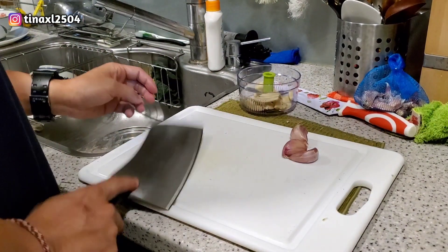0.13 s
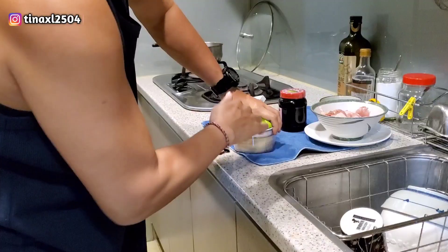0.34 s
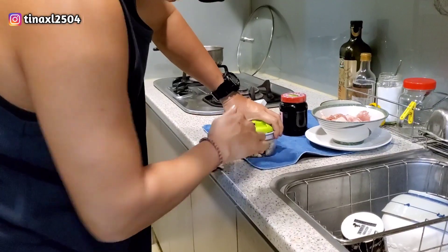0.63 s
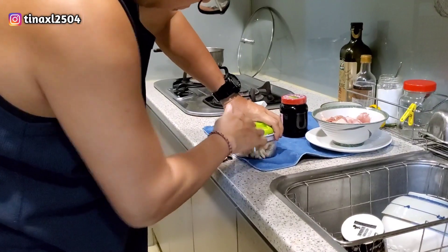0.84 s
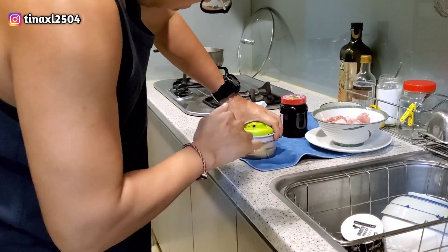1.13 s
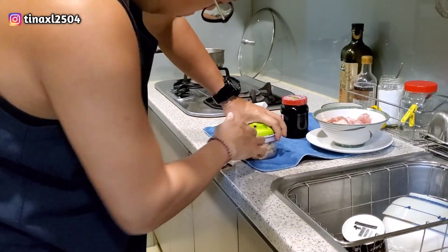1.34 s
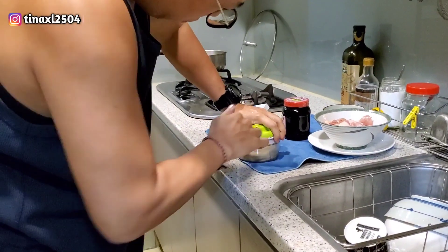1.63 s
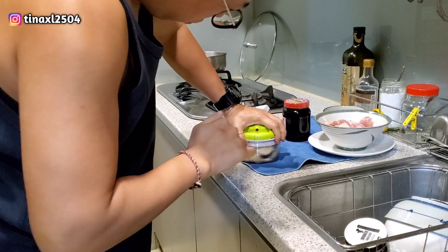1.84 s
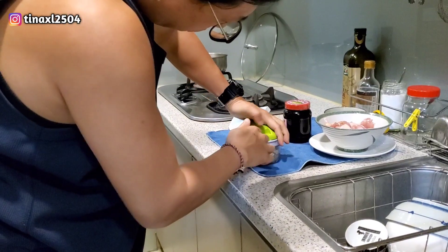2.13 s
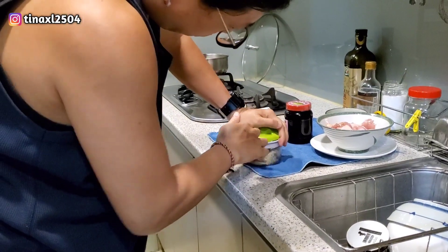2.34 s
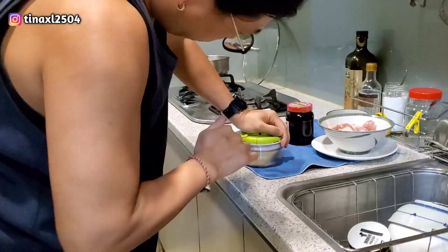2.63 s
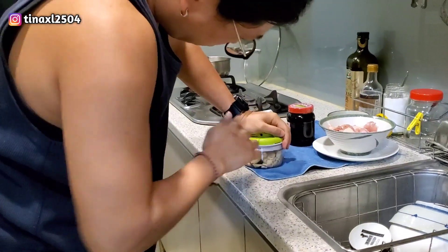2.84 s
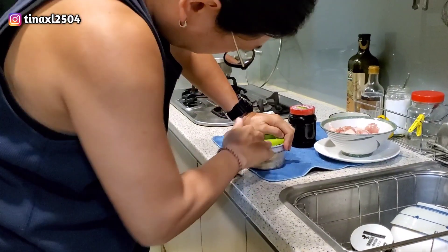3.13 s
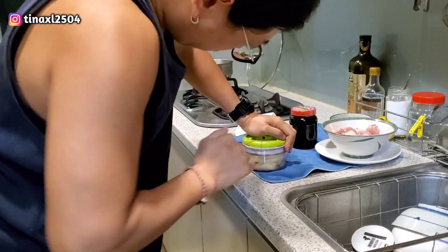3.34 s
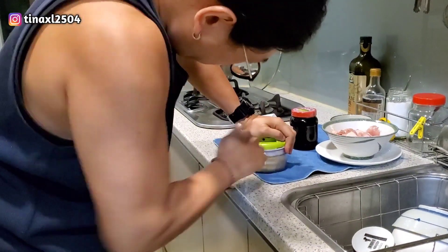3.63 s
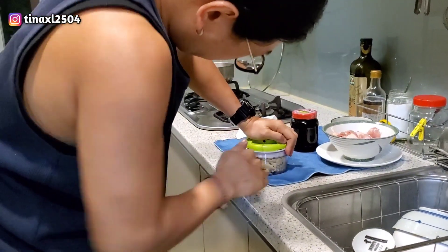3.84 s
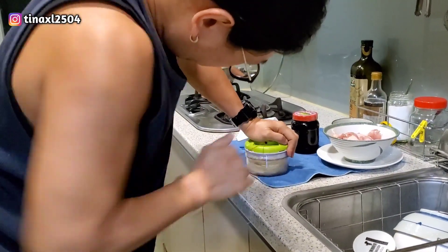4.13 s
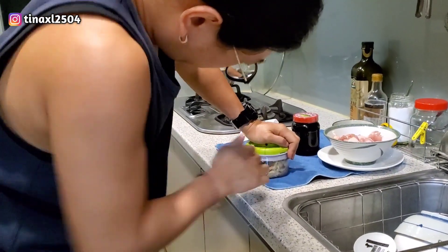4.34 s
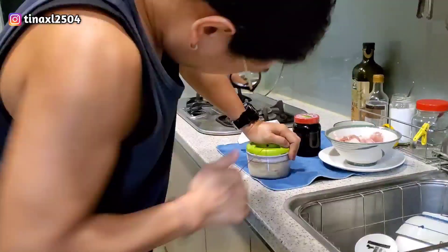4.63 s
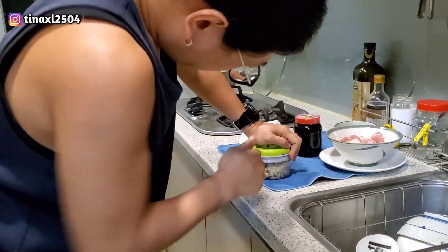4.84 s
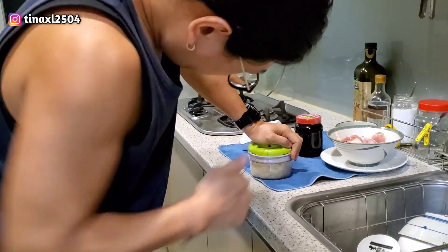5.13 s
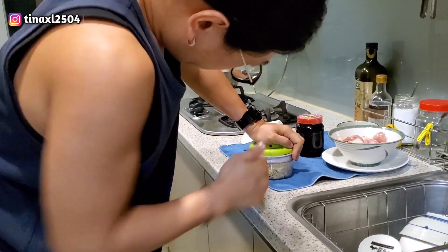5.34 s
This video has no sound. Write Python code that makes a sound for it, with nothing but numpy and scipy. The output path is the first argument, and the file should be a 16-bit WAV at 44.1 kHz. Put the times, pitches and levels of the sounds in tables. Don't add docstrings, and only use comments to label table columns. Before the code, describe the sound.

First a dying blade-and-board ring over faint hum, then close, gritty churning from a hand-pulled chopper. Hollow plastic bowl rattle surges with every pull, sags, and returns as the spring winds back with a ratchety zip. Clutch clacks mark the turns, one very hard near the middle. Low counter rumble beneath, brief squeaky plastic tones above, short tiled-room reflections, two spaced microphones.

```python
import sys
import numpy as np
from scipy import signal
from scipy.fft import rfft, irfft, next_fast_len
from scipy.io import wavfile
from scipy.ndimage import uniform_filter1d, map_coordinates

SR = 44100
rng = np.random.default_rng(int(sys.argv[2]) if len(sys.argv) > 2 else 0)


def to_linear_factor(level_db):
    exponent = np.asarray(level_db, float) / 20
    return 10 ** exponent


def generate_wav(signal):
    frames = np.transpose(np.atleast_2d(signal))
    scaled = np.clip(frames, -1, 1) * 32767
    pcm = np.round(scaled).astype(np.int16)
    wavfile.write(sys.argv[1], SR, pcm)


N = 242550

# frequency in Hz, level in dB, time to fade by 60 dB in seconds.
BLADE_RING = [(50, -3, 1.2), (199, -17, .9), (348, -7, .33), (513, -9, 1.2), (606, -17, .6),
              (1319, -21, .3), (2326, -25, .5), (2729, -3, .5), (2752, -9, .2), (3560, -19, .55),
              (3854, -16, .25), (4440, -14, .45), (6525, -26, .4)]
# frequency in Hz, level in dB, time to fade by 60 dB in seconds.
BOARD_THUD = [(206, 7, 0.2), (377, 0, 0.27), (109, -11, .2)]
# frequency in Hz, level in dB per Hz.
ECHO_COLOUR = [(35, -35), (60, -10), (600, -11), (720, -24), (1600, -23.5), (2780, -19), (4510, -27),
               (15000, -33.5)]
# frequency in Hz, level in dB per Hz.
ROOM_AIR = [(35, -29), (60, -7), (85, -37), (150, -25), (355, -29), (514, -33), (700, -39.5), (15000, -67)]
# frequency in Hz, time to fade by 60 dB in seconds.
TILE_ECHO = [(100, 0.36), (500, 0.41), (3000, 0.42), (12000, 0.27)]

# time in seconds, level in dB.
LONE_KNOCKS = [
    (0.289, -14),
    (3.6204, 29.5),
]
# time in seconds, peak in dB,
# then lid chatter, bright pawl chatter and rap, all in dB over that peak.
CATCHES = [(0.4085, -11.5, -1, -25, -6), (0.6474, -7, -8, -7.5, -8), (0.7, 1.5, -16, -12.5, -8),
           (0.884, -4, 0, -8.5, -16), (0.9527, -4, -1, -28, -6), (1.236, -16, 3, -4, -6),
           (1.272, -3, -4, -30, 2), (1.547, -2, -1.5, -14.5, -13), (1.938, -11, -21, -8, -8),
           (2.34, -9, -6, -13.5, -12), (2.818, -22.5, -2, -3, -12), (2.8524, -4.5, 3.5, -20, -11),
           (3.1365, -2.5, 0.5, -9.5, -16), (3.4255, -10, -9, -10, -6), (3.618, 5, -9, -17.5, -4),
           (3.854, -18, -16, -5, 8), (4.055, -1, -1, -12, -6), (4.31, -25, -18, -14, -6),
           (4.549, 0, -6.5, -9, -19), (4.797, -11, -19, -10, -8), (5.051, -1, -5, -12.5, -14),
           (5.324, -22, -10, -7, -12), (5.341, -5, 1.5, -16, -15)]
# frequency in Hz, width in Hz, level in dB.
LID_KNOCK = [(900, 500, -9), (1600, 450, 0), (2200, 350, -3), (4500, 3000, -18)]

# start in seconds, time to full speed in seconds,
# run-down in seconds, bowl level in dB, lid level in dB.
PULLS = [(0.301, 0.23, 0.13, -21, -23.5), (0.888, 0.14, 0.22, -17, -20), (1.549, 0.16, 0.2, -20, -24),
         (2.342, 0.23, 0.27, -22.5, -24), (3.139, 0.16, 0.1, -13.5, -18),
         (3.621, 0.085, 0.15, -20.5, -23.5), (4.059, .12, 0.11, -15.5, -20.5),
         (4.552, 0.099, 0.14, -14.5, -19), (5.055, 0.15, 0.095, -16.5, -23)]
# start in seconds, run-down in seconds,
# then bowl, ratchet and spring levels in dB.
RETURNS = [(0.647, 0.13, -18, -27, -15.5), (1.235, 0.17, -25, -28, -21.5), (1.932, 0.21, -22, -24.5, -18),
           (2.844, 0.16, -19.5, -25.5, -15.5), (3.426, 0.093, -19, -24, -27),
           (3.858, 0.088, -18.5, -26, -25), (4.311, 0.14, -19.5, -22.5, -35),
           (4.794, 0.14, -18, -23.5, -28), (5.336, 0.079, -16.5, -20, -28)]
LOSS_PER_SLOWING = [.9, 1.1, 1.4, 1.7]
REST_DB = [-46, -50, -66, -80]

# frequency in Hz, width in Hz, level in dB.
BOWL = [(373, 72, -5), (504, 61, -0.5), (638, 82, -3.5), (759, 45, 0.5), (970, 296, -4), (1180, 248, 1.5),
        (1432, 510, -5.5)]
# frequency in Hz, width in Hz, level in dB.
LID = [(1710, 254, -9), (1888, 99, 1.5), (2180, 310, -1)]
# frequency in Hz, width in Hz, level in dB.
RIM = [(2600, 380, 0), (3000, 520, -2)]
# time in seconds, rim level in dB over the lid.
GRIP = [(0, -41), (1.2, -46), (2.8, -35), (3.2, -8.5), (3.9, -8.5), (4.4, -6.5), (5.5, -1.5)]
# frequency in Hz, width in Hz, level in dB.
PAWL = [(3130, 3400, 3), (5040, 5250, 4.5), (6740, 1060, 4.5), (9930, 1730, -6), (11900, 2000, 1),
        (13720, 3400, -6)]
# frequency in Hz, width in Hz, level in dB.
SPRING = [(3850, 200, -6), (4400, 200, -8), (6480, 250, -5), (9050, 300, -6), (9680, 300, -4),
          (10620, 450, 0), (11250, 350, -3)]

# time in seconds,
# drumming in dB over the bowl, rumble in dB.
HAND_PRESS = [(0.3, 6, -74), (0.46, -14, -33), (1.15, -8, -36.5), (1.55, -9, -42), (1.95, -10.5, -36.5),
              (2.7, -8, -40.5), (3.3, -10.5, -35), (3.62, -10, -49), (3.82, -8.5, -36), (4.1, -10, -50),
              (4.45, -5.5, -43), (4.9, -9, -46), (5.5, -9, -45)]
# frequency in Hz, width in Hz, level in dB.
SLAB = [(145.8, 9.6, -4.5), (212.6, 21.5, 2.5), (223.4, 81, -7)]
# frequency in Hz, level in dB per Hz.
RUMBLE = [(12, -35), (20, 0), (38, -6.5), (107, -3.5), (120, -3.5), (160, -48), (260, -120)]

# time in seconds, frequency in Hz, level in dB.
WALL_SONGS = [(0.42, 2210, -18.5), (0.43, 1515, -17.5), (0.45, 786, -19), (0.68, 2240, -28),
              (0.93, 1470, -20), (1.02, 970, -20), (1.03, 1963, -19.5), (1.3, 2260, -26), (1.62, 2293, -26),
              (1.97, 2340, -19.5), (2.52, 1450, -23.5), (2.9, 617.5, -23.5), (3.43, 2730, -21),
              (3.43, 649, -25), (3.46, 1247, -23.5), (3.6, 2114, -19.5), (3.66, 1180, -25),
              (3.89, 2820, -22.5), (4.11, 624, -24), (4.12, 1337, -21.5), (4.32, 640, -25),
              (4.37, 2683, -18.5), (4.55, 756.5, -20), (4.65, 731, -30), (4.83, 2085, -35),
              (5.13, 386, -25.5), (5.36, 1350, -30), (5.37, 2183, -30)]
# time in seconds, frequency in Hz, level in dB.
WALL_SNAPS = [(0.697, 2200, -17), (0.883, 2233, -14), (1.269, 2210, -12), (4.55, 2596, -15),
              (5.053, 2504, -18)]

# frequency in Hz, likeness from 0 to 1.
LIKENESS = [(60, 1), (120, 0.92), (240, 0.97), (480, 0.69), (950, 0.054), (1890, 0.065), (5000, 0.013),
            (15000, 0.17)]
# frequency in Hz, left minus right in dB.
LEFT_LEAN = [(60, -2), (180, 0), (550, -0.5), (1650, -1.5), (4970, -3), (15000, -6)]


def unit(x):
    return x / np.sqrt(np.mean(x ** 2) + 1e-20)


def along(points, hz):
    f, v = np.transpose(points)
    return np.interp(np.log(hz + 1), np.log(f + 1), v)


def curves(rows):
    s, *cols = np.transpose(rows)
    return [np.interp(np.arange(N) / SR, s, c, left=-120) for c in cols]


def wobble(rate):
    knots = rng.standard_normal(int(N * rate / SR) + 4)
    return map_coordinates(knots, [np.arange(N) * rate / SR])


def filtered(x, response):
    m = next_fast_len(x.shape[-1] + SR // 4)
    return irfft(rfft(x, m) * response(np.fft.rfftfreq(m, 1 / SR)), m)[..., :x.shape[-1]]


def resonant(x, modes):
    def response(f):
        total = 0
        for k, (centre, width, db) in enumerate(modes):
            peak = 1j * f * width / (centre * centre - f * f + 1j * f * width)
            total = total + (-1) ** k * to_linear_factor(db) * peak
        return total
    return filtered(x, response)


def hiss(spectrum):
    return unit(filtered(rng.standard_normal((2, N)), lambda hz: to_linear_factor(along(spectrum, hz))))


def chatter(per_s, spread_db, life_s, rub):
    taps = (rng.random(N) < per_s / SR) * to_linear_factor(spread_db * rng.standard_normal(N))
    fall = np.exp(-1 / (life_s * SR))
    scratch = (unit(signal.lfilter([1], [1, -fall], taps)) + rub) * rng.standard_normal((2, N))
    ticks = unit(taps) * np.sign(rng.standard_normal((2, N)))
    return unit(unit(scratch) + 0.32 * ticks)


def patchy(x, depth_db):
    z = signal.stft(x, nperseg=1024)[2]
    field = uniform_filter1d(rng.standard_normal(z.shape[1:]), size=3, axis=0)
    field = uniform_filter1d(field, size=5, axis=1)
    return unit(signal.istft(z * to_linear_factor(depth_db * unit(field)), nperseg=1024)[1][:, :N])


def cleaver():
    t = np.arange(SR // 2) / SR
    ring = np.zeros((2, len(t)))
    for hz, db, t60 in BLADE_RING + BOARD_THUD:
        phase = 2 * np.pi * rng.random((2, 1))
        ring += to_linear_factor(db - 60 * t / t60) * np.sin(2 * np.pi * hz * t + phase)
    hz, when, z = signal.stft(hiss(ECHO_COLOUR)[:, :len(t)], SR, nperseg=256)
    fade = to_linear_factor(-60 * when / along(TILE_ECHO, hz)[:, None])
    echo = signal.istft(z * fade, SR, nperseg=256)[1][:, :len(t)]
    air = hiss(ROOM_AIR)[:, :len(t)]
    cut = np.clip((.385 - t) / .07, 0, 1)
    tail = cut * (to_linear_factor(-27.5) * ring + to_linear_factor(-23.5) * echo + to_linear_factor(-46.0) * air)
    return np.pad(tail, [(0, 0), (0, N - len(t))])


def settle(shakes, t60):
    t = np.arange(SR // 8) / SR
    return signal.fftconvolve(shakes, to_linear_factor(-60 * t / t60) * (1 - np.exp(-t / 0.0024)))[:N]


def catches():
    raps, lid_shake, pawl_shake = np.zeros((3, N))
    for s, db, lid_db, bright_db, rap_db in CATCHES:
        raps[round((s + .0015) * SR)] = to_linear_factor(db + rap_db + 18.5)
        lid_shake[round(s * SR)] = to_linear_factor(db + lid_db - 10.5)
        pawl_shake[round(s * SR)] = to_linear_factor(db + bright_db - 3)
    for s, db in LONE_KNOCKS:
        raps[round(s * SR)] = -to_linear_factor(db)
    loose = chatter(per_s=900, spread_db=3, life_s=.0015, rub=1.2)
    lid = settle(lid_shake, t60=0.16) * unit(resonant(loose, LID) + 0.96 * resonant(loose, BOWL))
    pawl = settle(pawl_shake, t60=0.078) * unit(resonant(loose, PAWL))
    raps = uniform_filter1d(raps, size=7)
    return resonant(raps, LID_KNOCK) * [[1], [.6]] + lid + pawl


def slowness(start, rise, fall, start_db, stop_db, swell, sag):
    t = np.arange(N) / SR - start
    up = start_db * np.clip(1 - t / rise, 0, 1) ** swell
    down = stop_db * np.clip((t - rise) / fall, 0, 4) ** sag
    coast = 15.5 + 24 * np.abs(t - rise)
    return up + np.minimum(down, coast) + 200 * (t < 0), np.clip(t, 0, 1)


def strokes():
    slack_s = .011
    return_rise_s = 0.081
    return_lid_db = -18.5
    power = to_linear_factor(REST_DB)[:, None] ** 2 * np.ones(N)
    for s, rise, fall, bowl_db, lid_db in PULLS:
        slow_db, _ = slowness(s - slack_s, rise, fall, start_db=14.5, stop_db=20.5, swell=2.18, sag=3.35)
        spring_db = 2.3 * (bowl_db + 7) - 18.5 - 27.5
        top_db = np.array([bowl_db, lid_db, bowl_db - 12, spring_db])
        power = power + to_linear_factor(top_db[:, None] - np.outer(LOSS_PER_SLOWING, slow_db)) ** 2
    for s, fall, bowl_db, ratchet_db, spring_db in RETURNS:
        slow_db, age = slowness(s, return_rise_s, fall, start_db=9, stop_db=13.5, swell=2.1, sag=2.1)
        top_db = np.array([bowl_db, return_lid_db, ratchet_db, spring_db])
        level_db = top_db[:, None] - np.outer(LOSS_PER_SLOWING, slow_db)
        level_db[3] += 81 * (return_rise_s - age)
        power = power + to_linear_factor(level_db) ** 2
    enter = np.clip((np.arange(N) / SR - .305) / .12, 1e-2, 1) ** 2
    return uniform_filter1d(10 * np.log10(power), size=300, axis=1) + 20 * np.log10(enter)


def reel(levels_db):
    bowl_db, lid_db, ratchet_db, spring_db = levels_db
    judder = wobble(28)
    skip = wobble(9.6)
    gears = chatter(per_s=600, spread_db=3, life_s=.0018, rub=1.1)
    food = chatter(per_s=280, spread_db=1.0, life_s=0.002, rub=1.0) + 1.3 * gears
    lid = unit(resonant(gears, LID)) + to_linear_factor(curves(GRIP)[0]) * unit(resonant(gears, RIM))
    bowl = to_linear_factor(bowl_db - 1.5 + 0.53 * judder) * patchy(resonant(food, BOWL), depth_db=1.5)
    lid = to_linear_factor(lid_db + 1.0 + 0.74 * judder + 0.4 * wobble(60)) * patchy(lid, depth_db=2.0)
    shell = filtered(bowl + lid, lambda hz: 1 / (1 + (hz / 3300) ** 5))
    ratchet_level = to_linear_factor(ratchet_db + 4.5 + 0.86 * judder + 0.24 * skip)
    ratchet = ratchet_level * patchy(resonant(gears, PAWL), depth_db=3.65)
    spring = to_linear_factor(spring_db - 8.5 + 3.8 * judder + 0.27 * skip) * unit(resonant(gears, SPRING))
    return shell + ratchet + spring


def counter(bowl_db):
    press_db, rumble_db = curves(HAND_PRESS)
    thumps = chatter(per_s=120, spread_db=3, life_s=.005, rub=1.2)
    late_bowl_db = np.roll(bowl_db, round(0.012 * SR))
    drum = to_linear_factor(press_db + 1.08 * (late_bowl_db + 19) - 19.5) * unit(resonant(thumps, SLAB))
    return drum + to_linear_factor(rumble_db + 0.17 * wobble(6.1)) * hiss(RUMBLE)


def kitchen(x, t60):
    t = np.arange(SR // 3) / SR
    tail = rng.standard_normal((2, len(t))) * to_linear_factor(-60 * t / t60) * (t > .004)
    return signal.fftconvolve(x, tail / np.linalg.norm(tail[0]), axes=1)[:, :N]


def singing(tones, length_s, damping):
    out = np.zeros((2, N + SR))
    t = np.arange(SR // 3) / SR
    u = np.clip(t / length_s, 0, 1)
    for s, hz, db in tones:
        fall = np.exp(-np.pi * (70 + hz * damping) / SR)
        drift = signal.lfilter([1], [1, -fall], rng.standard_normal((2, 2, len(t))))
        tone = unit(drift[0] * np.cos(2 * np.pi * hz * t) + drift[1] * np.sin(2 * np.pi * hz * t))
        out[:, round(s * SR):][:, :len(t)] += to_linear_factor(db + 1.0) * np.sin(np.pi * u ** 0.47) * tone
    return out[:, :N]


def scene():
    levels_db = strokes()
    walls = singing(WALL_SONGS, length_s=0.16, damping=.035)
    walls = walls + singing(WALL_SNAPS, length_s=0.04, damping=.06)
    chopper = catches() + reel(levels_db) + walls
    echo = to_linear_factor(-6.5) * kitchen(chopper, t60=0.38)
    pair = cleaver() + chopper + echo + counter(levels_db[0])

    def spread(hz):
        angle = np.arccos(np.clip(along(LIKENESS, hz), -1, 1)) / 2
        return np.array([np.cos(angle), np.sin(angle)])
    mid, side = filtered(pair, spread)
    both = np.array([mid + side, mid - side])
    return filtered(both, lambda hz: to_linear_factor(np.outer([.5, -.5], along(LEFT_LEAN, hz))))


def top_cut(x):
    return signal.sosfilt(signal.butter(12, 15790, fs=SR, output="sos"), x)


def record(dry):
    x = filtered(dry, lambda hz: 1 - .5 * np.exp(-((hz - 7750) / 550) ** 2))
    x = x / (1 + np.abs(x / .93) ** 6) ** (1 / 6)
    x = filtered(x, lambda hz: 1 / (1 + np.exp(np.clip((hz - 15450) / 130, -50, 50))))
    return top_cut(x)


dry = scene()
out = record(dry)
generate_wav(out)
```